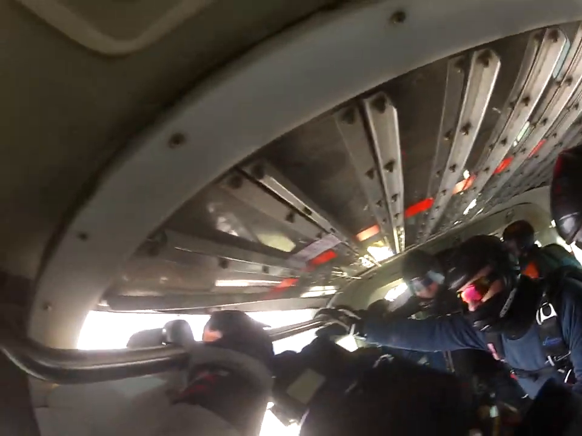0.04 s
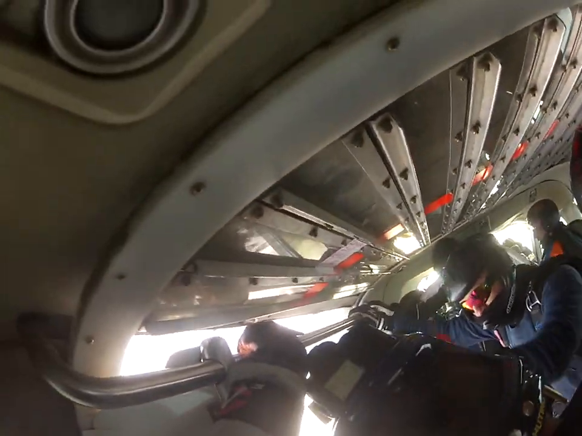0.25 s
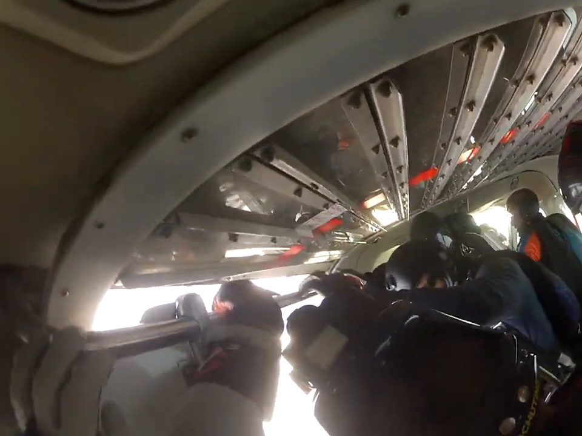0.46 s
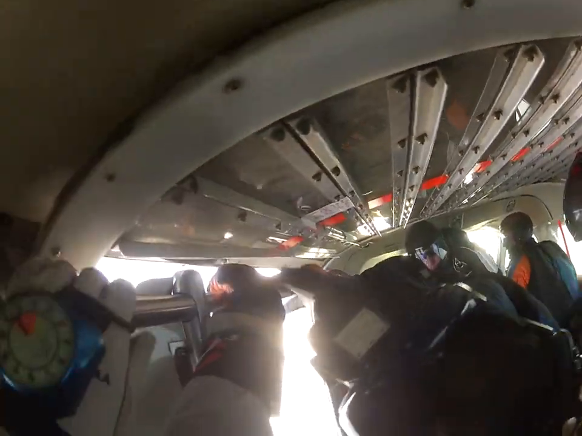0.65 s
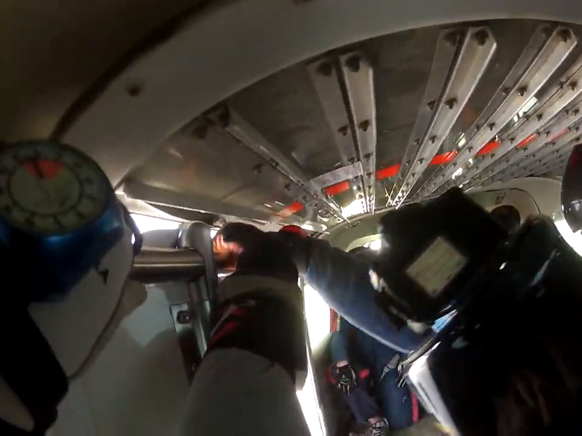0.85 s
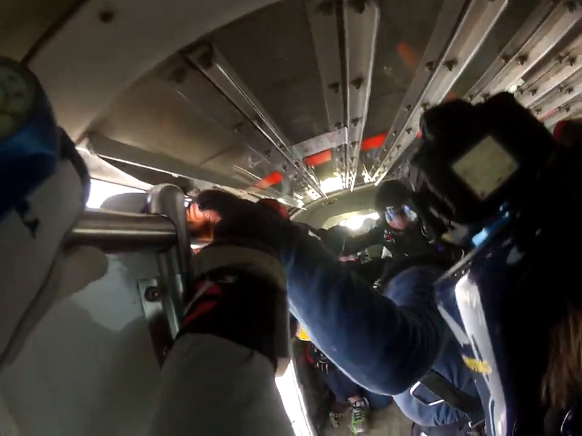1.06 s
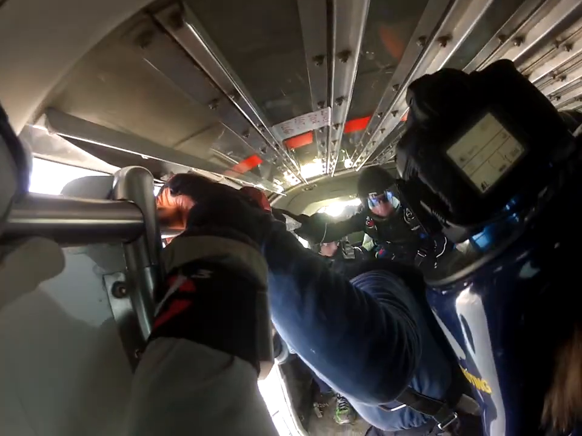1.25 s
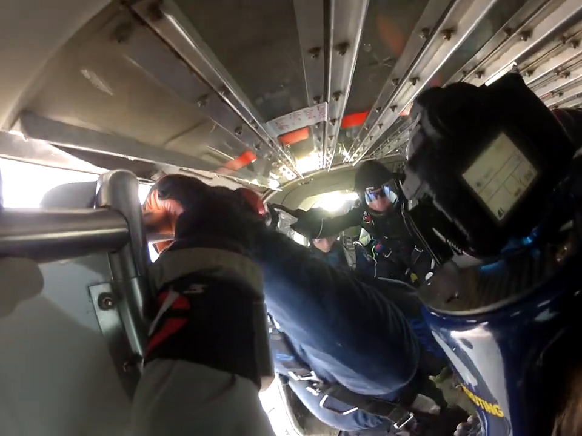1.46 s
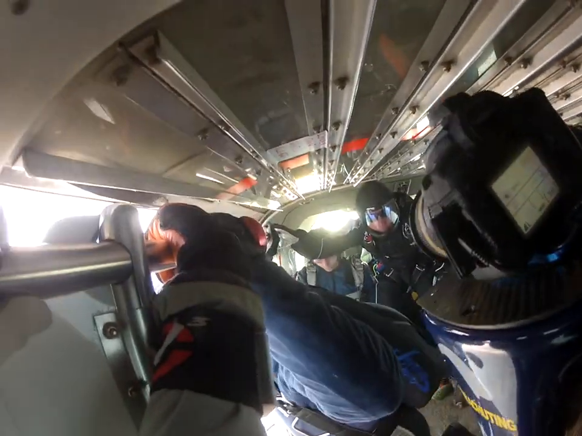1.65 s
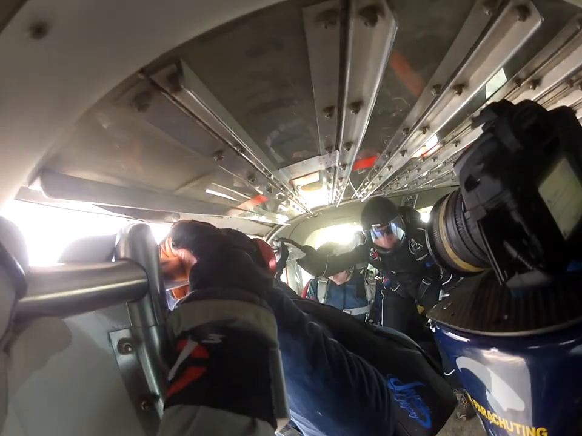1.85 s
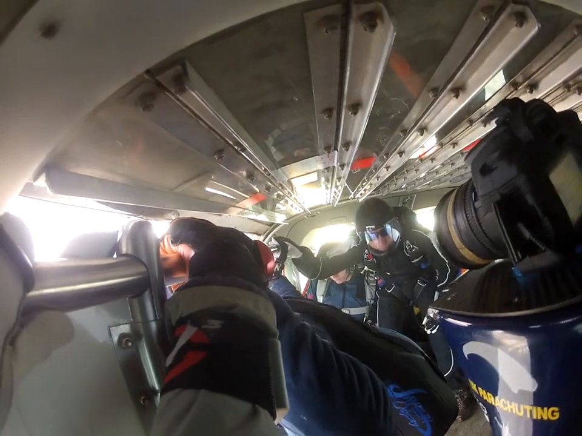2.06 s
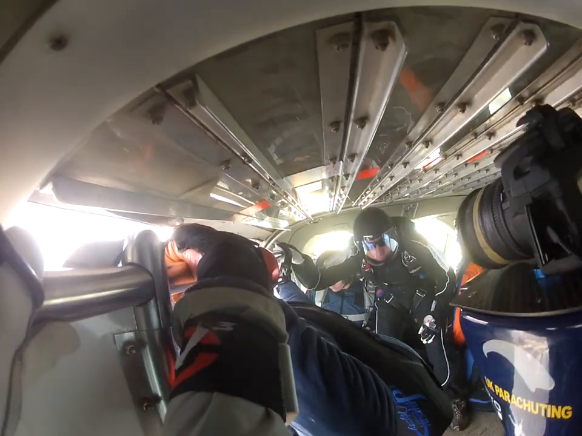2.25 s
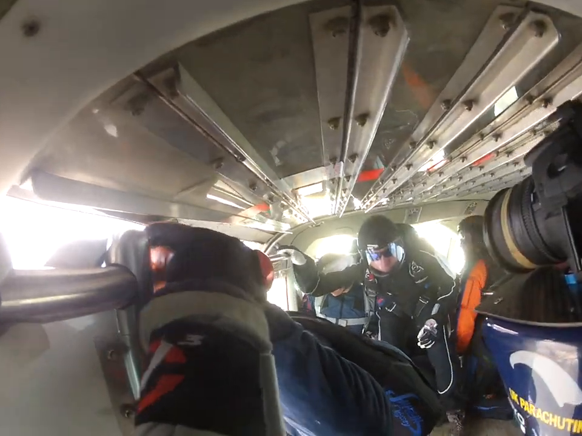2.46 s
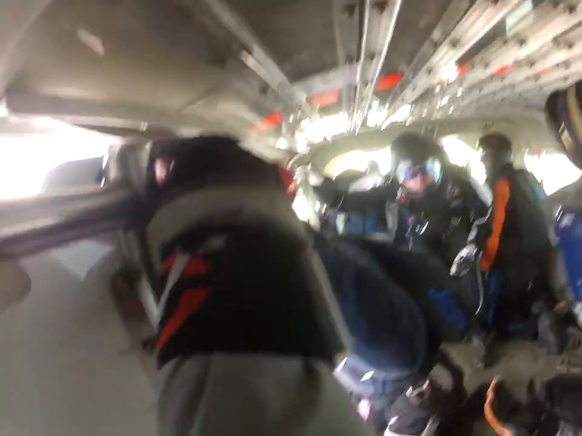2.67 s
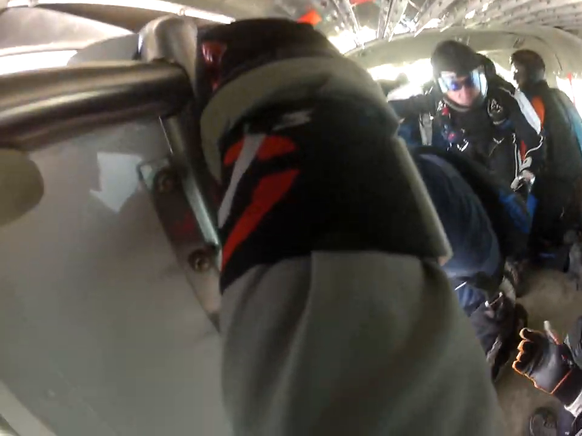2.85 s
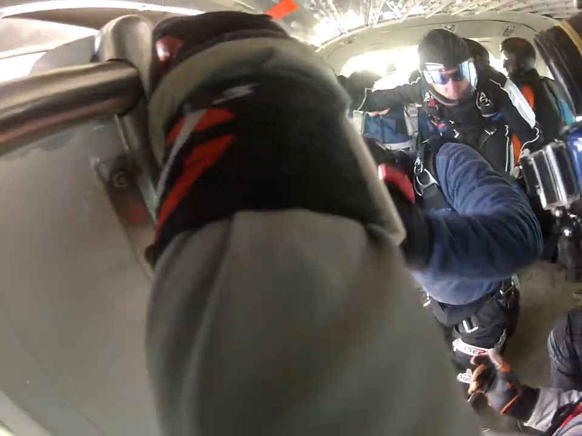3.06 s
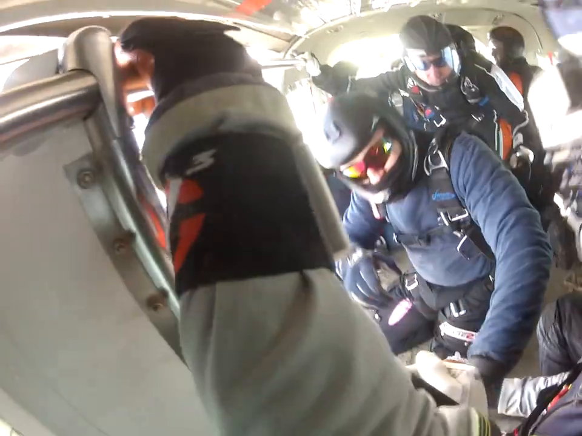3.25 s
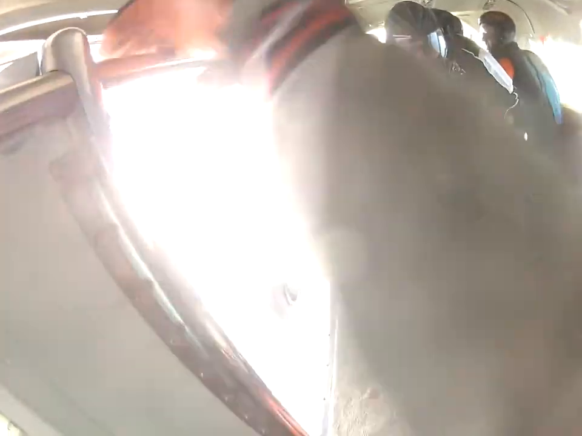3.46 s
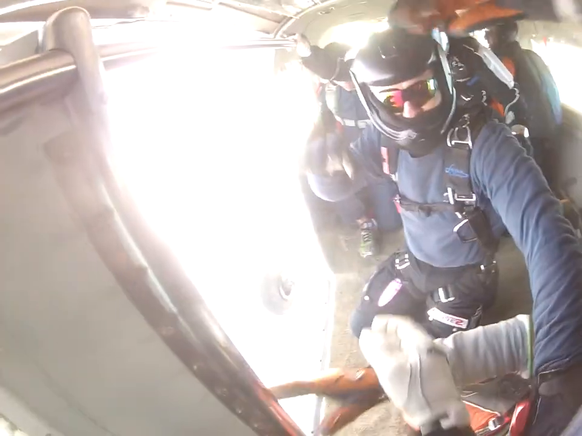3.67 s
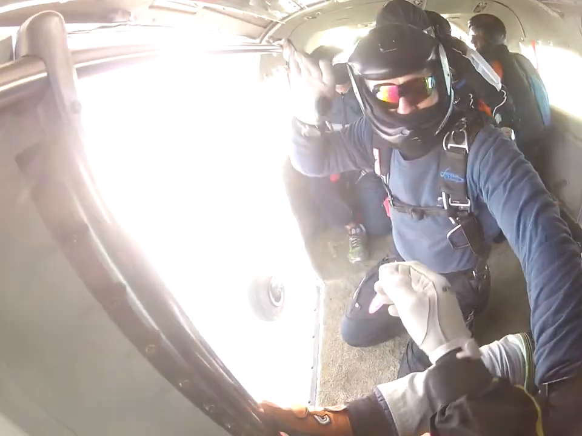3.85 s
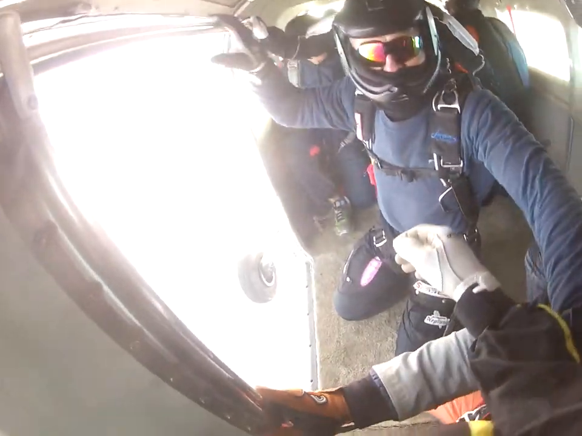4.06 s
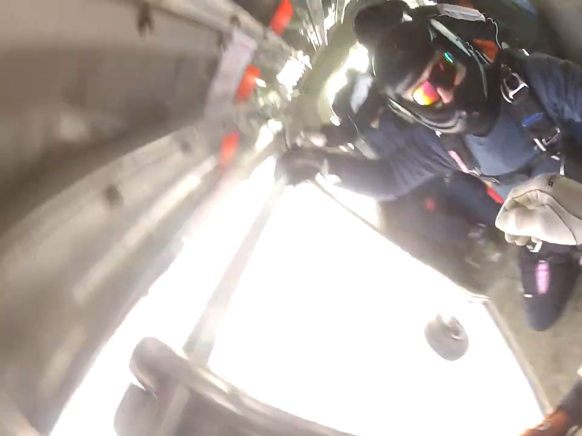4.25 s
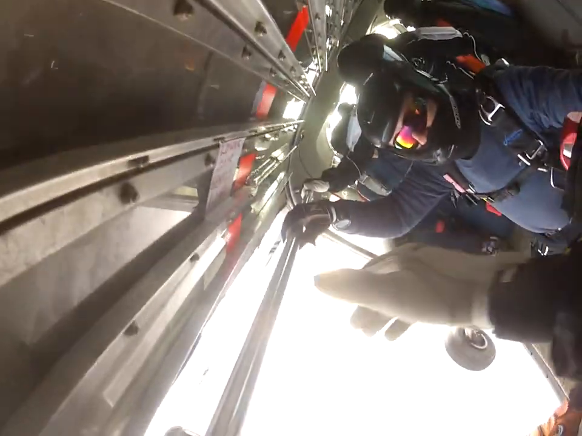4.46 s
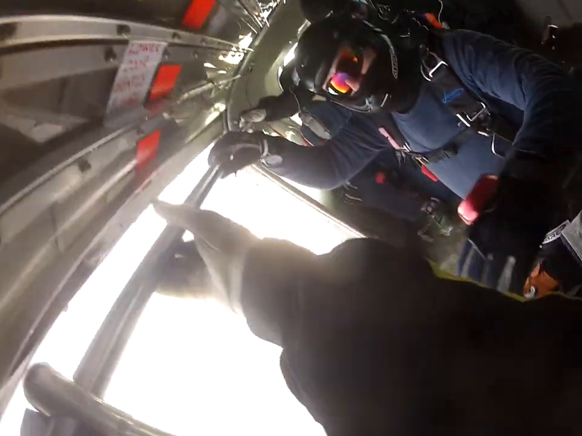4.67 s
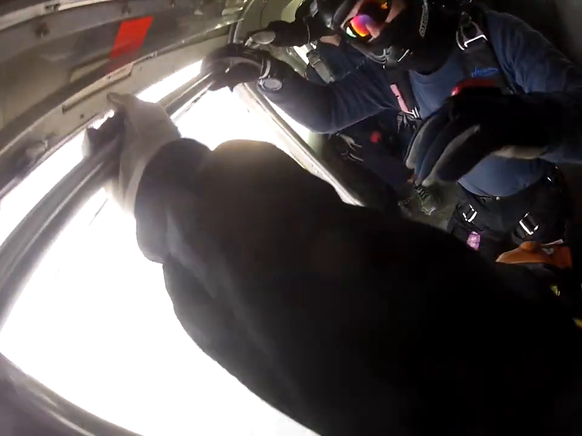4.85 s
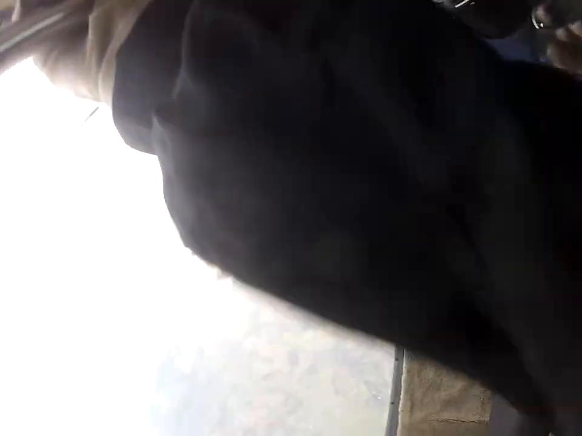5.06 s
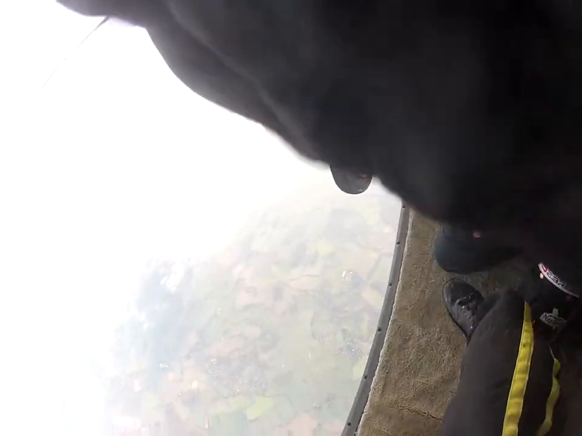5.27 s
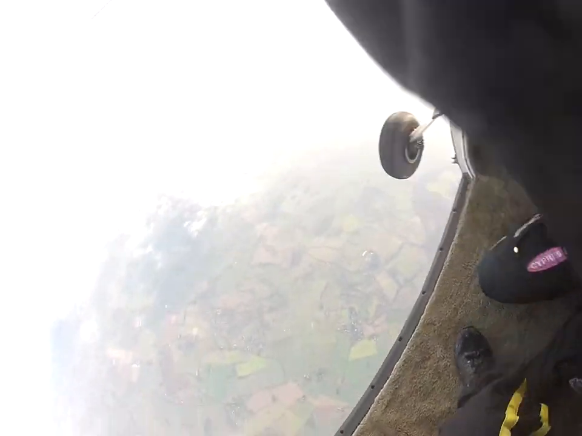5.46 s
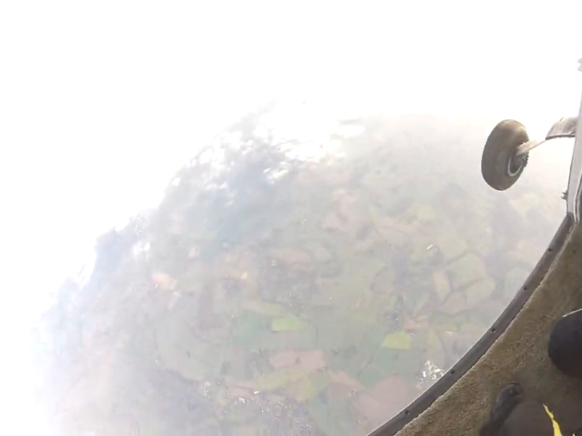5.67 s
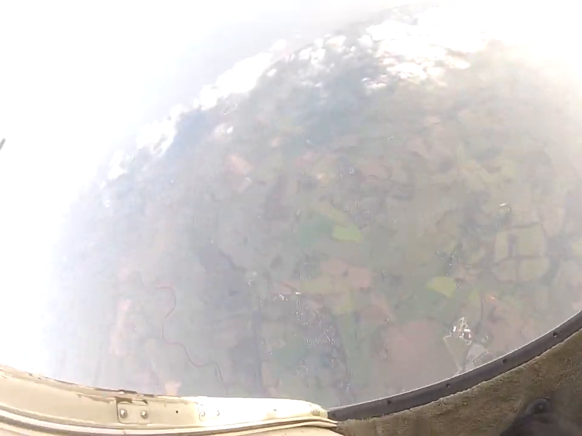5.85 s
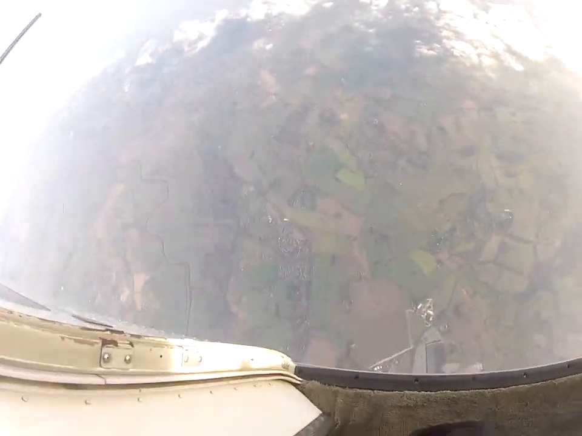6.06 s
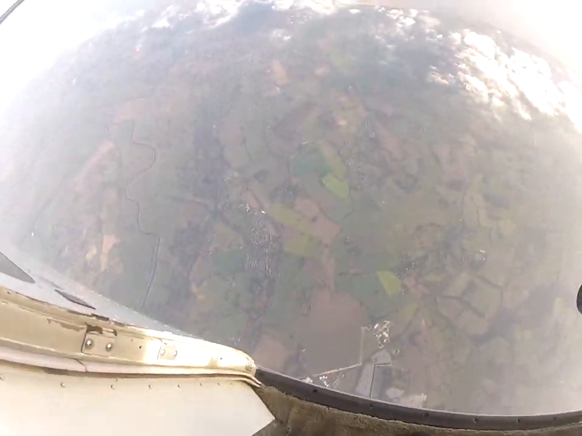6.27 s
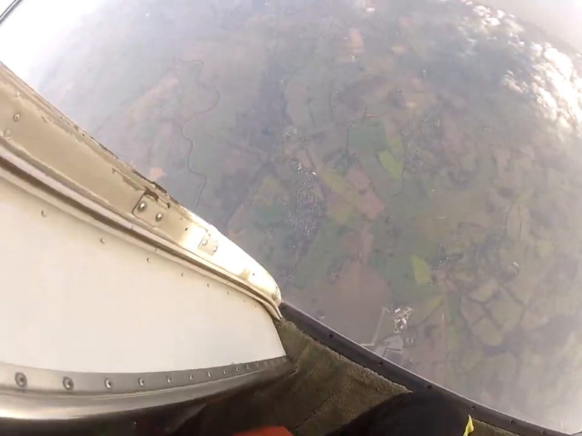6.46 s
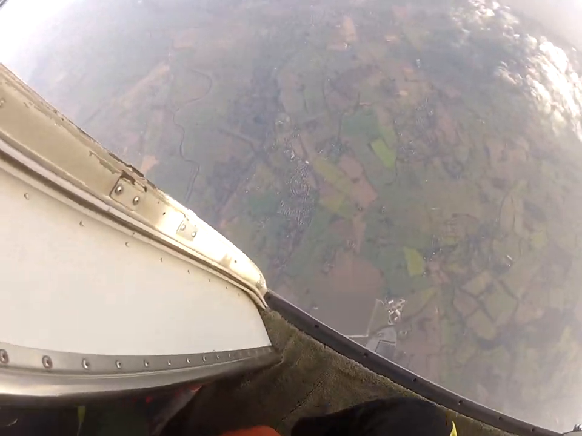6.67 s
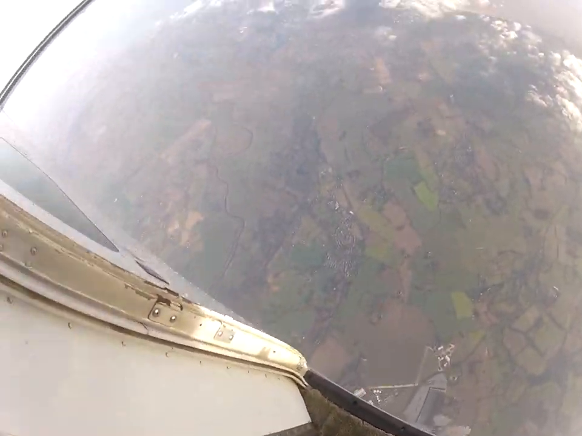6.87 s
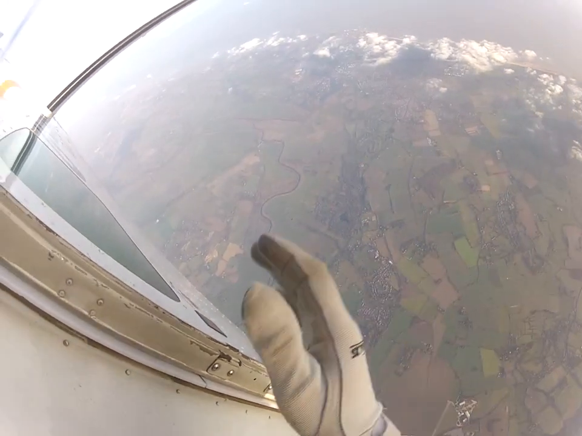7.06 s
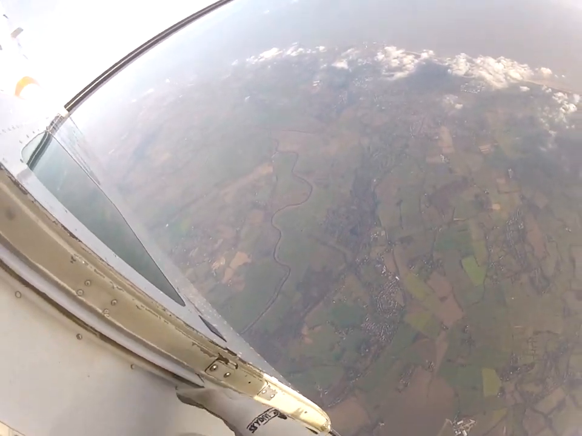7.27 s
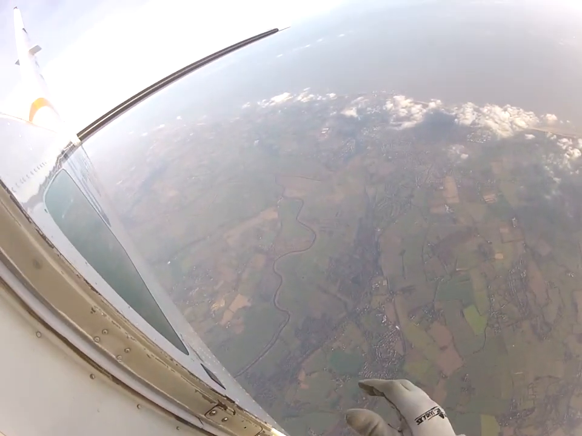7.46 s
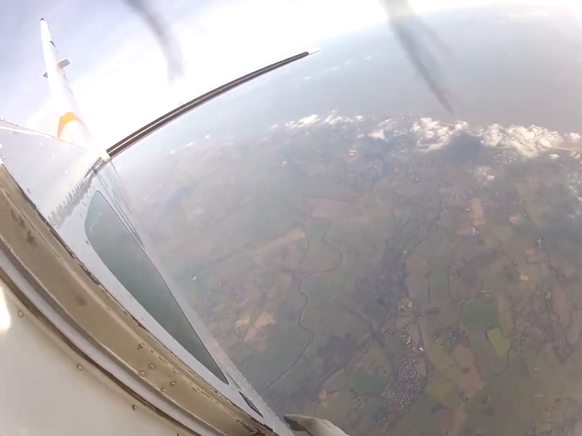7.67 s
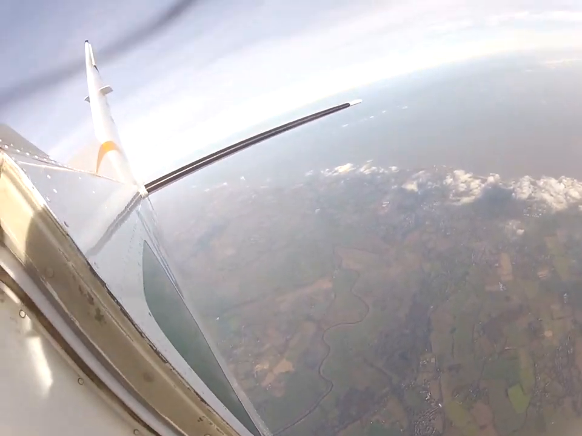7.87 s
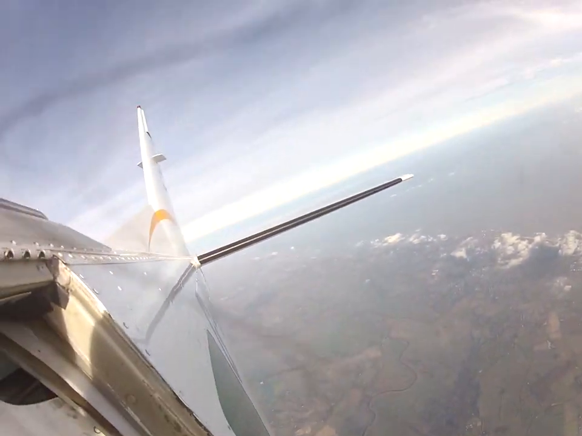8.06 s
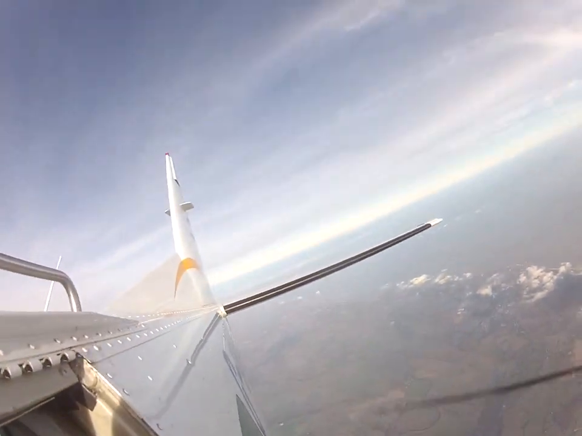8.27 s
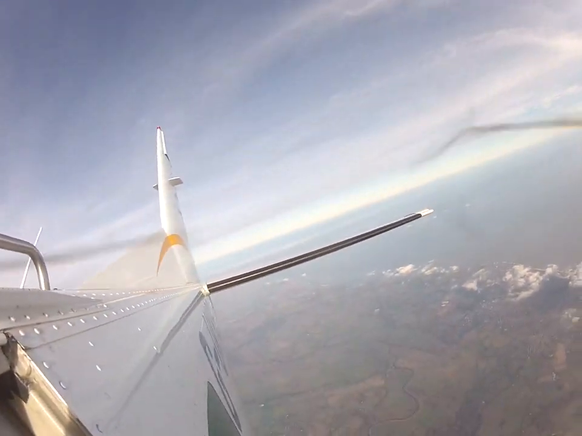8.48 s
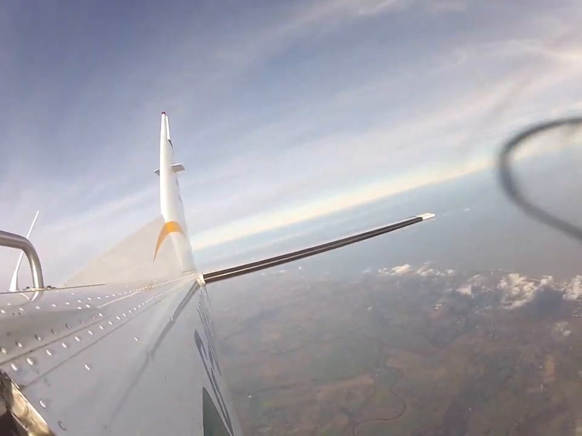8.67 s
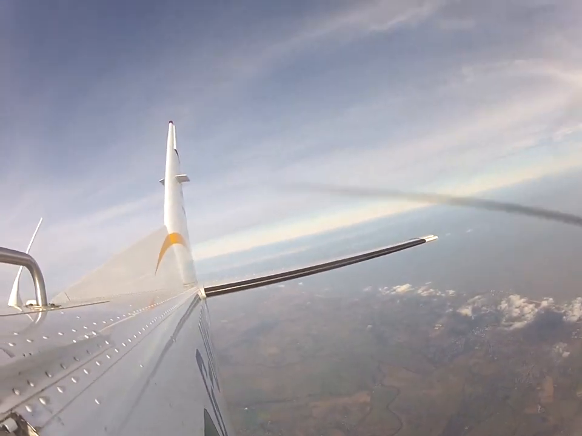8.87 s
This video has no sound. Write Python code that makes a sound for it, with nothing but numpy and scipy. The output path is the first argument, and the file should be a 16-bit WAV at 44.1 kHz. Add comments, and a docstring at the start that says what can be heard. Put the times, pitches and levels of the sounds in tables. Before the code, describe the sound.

Engine hum and flapping air inside a small plane give way to much louder, buffeting wind outside the door.

```python
"""A camera in a case rides in the open door of a jump plane, then is carried out into the wind.
At first the engine and airframe drone, air flutters past the door and gusts thump the microphone.
Near 2.7 s the camera leans into the doorway and the rush grows; near 4.9 s one hard gust hits it.
From about 5.2 s it is outside: the open air roars, and eddies (swirls of air) shake the case and
tear off it in short hissing bursts. The strongest gusts overload the recorder."""
import sys
import numpy as np
from scipy import signal
from scipy.fft import irfft, next_fast_len
from scipy.io import wavfile
from scipy.ndimage import uniform_filter1d

SR = 44100
rng = np.random.default_rng(int(sys.argv[2]) if len(sys.argv) > 2 else 0)


def pcm_store(signal):
    """Save signal as 16-bit PCM."""
    levels = np.round(np.clip(np.atleast_2d(signal), -1, 1) * 32767)
    wavfile.write(sys.argv[1], SR, levels.astype(np.int16).T)


N = 393372
TIME = np.arange(N) / SR
HZ = np.fft.rfftfreq(2 * next_fast_len(N // 2 + 1), 1 / SR)


def gain_of(db):
    """Turns decibels into a number to multiply by."""
    return 10 ** (np.asarray(db) / 20)


def evened(x):
    """Scales a signal to an average power of 1."""
    return x / np.sqrt(np.mean(x ** 2) + 1e-20)


def curve(rows, column=1):
    """Joins a table's points with straight lines, giving a value for every sample."""
    rows = np.asarray(rows)
    return np.interp(TIME, rows[:, 0], rows[:, column])


def colour(points, resonances=()):
    """Gain at every frequency: a smooth outline plus a body's round peaks and steep dips."""
    hz, db = np.transpose(points)
    grid = HZ[::8]
    outline_db = np.interp(np.log(grid + 1), np.log(hz + 1), db, left=-100)
    body_db = sum(height * np.exp(-np.minimum(abs((grid - centre) / width) ** (2 if height > 0 else 4), 20))
                  for centre, width, height in resonances)
    return np.interp(HZ, grid, gain_of(outline_db + body_db))


def noise(gain):
    """Noise of power 1, shaped by a gain at every frequency."""
    spectrum = rng.standard_normal(len(HZ)) + 1j * rng.standard_normal(len(HZ))
    return evened(irfft(gain * spectrum)[:N])


def steadied(x, seconds):
    """Evens out changes in strength that are slower than the given time."""
    power = uniform_filter1d(x ** 2, max(int(seconds * SR), 2))
    return x / np.sqrt(abs(power) + 1e-9)


def eddies(slow_hz, fast_hz):
    """Random swings of air speed, mostly between two rates."""
    low_cut = HZ / np.hypot(HZ, slow_hz) * (HZ > slow_hz / 2)
    return noise(low_cut / np.sqrt(1 + (HZ / fast_hz) ** 3))


def gusting(swing, depth_db):
    """A gain that rises and falls with the eddies."""
    return evened(gain_of(depth_db * 2 * np.tanh(swing / 2)))


def puffs(rows, rise_s):
    """Loudness of short spurts of air: each swells, holds briefly, then collapses."""
    envelope = np.zeros(N)
    for at, db, length in rows:
        near = slice(max(int((at - rise_s) * SR), 0), int((at + .1) * SR))
        t = TIME[near] - at + rise_s
        swell = np.sin(np.pi / 2 * np.clip(t / (2 * rise_s), 0, 1)) ** 2
        collapse = np.exp(-(abs(t) / (length + rise_s)) ** 5)
        envelope[near] += gain_of(db) * swell * collapse
    return envelope


def shedding(per_s):
    """Loudness of small eddies peeling off an edge: a loose train of uneven puffs."""
    gaps, sizes = rng.standard_normal((200, 2)).T
    times = np.cumsum(np.exp(.4 * gaps)) / per_s
    levels_db = 2.5 * np.clip(sizes, -2, 1.2)
    return puffs([(at, db, .011) for at, db in zip(times, levels_db)], rise_s=.0043)


def outside():
    """How far the camera is through the door: 0 inside, 1 outside."""
    return np.interp(TIME, [5.13, 5.2], [0, 1])


# The cabin's drone. Each row: time in seconds, level in dB.
DRONE_LEVEL = [(0, -32.5), (1.0, -33.5), (1.35, -30.5), (1.65, -33.5), (2.65, -34), (2.9, -28), (3.2, -32),
               (4.6, -33), (5.15, -31.5)]
# Its tone. Each row: frequency in Hz, relative level in dB.
DRONE_TONE = [(53, -34), (90, -4.5), (130, 0), (162, -7), (199, -6), (291, -8), (324, -10.5), (377, -10.5),
              (459, -18), (650, -25.5), (840, -50), (1430, -120)]

def drone():
    """Engine and airframe fill the cabin with a low, slightly wavering drone."""
    hum = steadied(noise(colour(DRONE_TONE)), .26) * gain_of(curve(DRONE_LEVEL))
    waver = gusting(eddies(slow_hz=1.8, fast_hz=10), depth_db=1)
    return np.sqrt(1 - outside()) * hum * waver


# The tone of air rushing past the door. Each row: frequency in Hz, relative level in dB.
DOORWAY_TONE = [(250, -35), (520, -10), (750, -8.5), (1200, -13.5), (2700, -16.5), (3100, -9.5),
                (5300, -20), (9000, -22.5), (15200, -31.5)]
# How the case colours cabin sound. Each row: frequency in Hz, width in Hz, boost or cut in dB.
CASE_IN_CABIN = [(1480, 157, 10), (1988, 240, 13), (2450, 190, 8), (6020, 380, -16), (10060, 490, 9),
                 (11290, 400, -17), (12800, 400, -14), (14040, 650, 12.5)]
# Sharp flaps of air at the door's edge. Each row: time in seconds, level in dB.
DOOR_FLAPS = [(.488, -29), (.561, -32), (.643, -33.5), (1.298, -31), (1.426, -29), (2.878, -26.5),
              (3.112, -28), (3.307, -26), (3.371, -28), (3.447, -28), (3.668, -27), (3.805, -27),
              (3.978, -30), (4.274, -25), (4.425, -26), (4.762, -30), (4.952, -27)]
FLUTTER_DB, HISS_DB = -37.3, -45  # before the camera leans out

def doorway():
    """Fast air sliding past the cabin's still air flutters and flaps over an even hiss."""
    shape = colour(DOORWAY_TONE, CASE_IN_CABIN)
    leaning = np.interp(TIME, [2.7, 2.8], [0, 1])
    lean_db = 4 * leaning
    # The share of each frequency that flutters: most of the middle, some of the top.
    middle = np.exp(-((HZ - 1750) / 750) ** 4)
    top = HZ ** 4 / (HZ ** 4 + 6500 ** 4)
    lively = np.clip(.1 + .8 * middle + .45 * top, 0, 1)
    lively_shape = shape * np.sqrt(lively)
    swing = evened(eddies(slow_hz=18, fast_hz=10.4) + .8 * eddies(slow_hz=30.4, fast_hz=80))
    wobble = gusting(swing, depth_db=2 + .4 * leaning)
    spurts = gain_of(-.5 + 4.5 * leaning) * shedding(per_s=19)
    strength = steadied(np.hypot(wobble, spurts), .27)
    flutter = gain_of(FLUTTER_DB + lean_db) * strength * noise(lively_shape)
    # A flap rings the case's low resonances and has little treble.
    dull_air = noise(lively_shape / np.hypot(1, HZ / 2500))
    flaps = puffs([(at, db, .012) for at, db in DOOR_FLAPS], rise_s=.0031) * dull_air
    hiss = gain_of(HISS_DB + lean_db) * noise(shape * np.sqrt(1 - lively))
    return np.sqrt(1 - outside()) * (flutter + flaps + hiss)


# The open air's low roar. Each row: time in seconds, relative level in dB.
ROAR_LEVEL = [(5.15, -31.5), (5.39, -26.5), (5.66, -30.5), (5.8, -19.5), (6.2, -21), (7.0, -19.5),
              (7.12, -25), (7.45, -22), (8.1, -24), (8.25, -27.5), (8.64, -23), (8.9, -24)]
# Its tone. Each row: frequency in Hz, relative level in dB.
ROAR_TONE = [(53, -23), (90, -2), (118, -4), (172, -1.5), (237, -6), (511, -21.5), (650, -33.5), (840, -46),
             (1430, -120)]

def roar(flow):
    """The open air roars in lumps; the part above about 270 Hz jumps most with each burst."""
    shape = colour(ROAR_TONE)
    upper = 1 / (1 + (270 / (HZ + 1)) ** 6)
    upper_share = np.sum(shape ** 2 * upper) / np.sum(shape ** 2)
    push = steadied(flow, .19)
    low = np.sqrt(1 - upper_share) * noise(shape * np.sqrt(1 - upper)) * push ** .53
    high = np.sqrt(upper_share) * noise(shape * np.sqrt(upper)) * push ** .81
    low *= gain_of(np.interp(TIME, [7.5, 7.9], [0, -2.5]))  # thins as the camera turns to the tail
    lumps = gusting(eddies(slow_hz=4.3, fast_hz=25), depth_db=1.7)
    open_air = steadied((low + high) * lumps, .17) * gain_of(curve(ROAR_LEVEL) + 2.04)
    return np.sqrt(outside()) * open_air


def thump(at_s, level_db, pitch_hz, length_s):
    """A lone gust hits the microphone with one push and pull of pressure."""
    t = TIME - at_s
    envelope = np.exp(-np.minimum((t / length_s) ** 2, 20))
    return -gain_of(level_db) * np.sin(2 * np.pi * pitch_hz * t) * envelope


# The steady push of eddies on the microphone. Each row: time in seconds, level in dB.
BUFFET_LEVEL = [(0, -34), (1.3, -34), (2.65, -34.5), (3.3, -31), (4.3, -34.5), (4.8, -33.5), (5.15, -29),
                (5.3, -18), (5.8, -11.5), (5.97, -22.5), (6.5, -17.5), (7.2, -19.5), (7.65, -15),
                (8.1, -11.5), (8.5, -20.5), (8.68, -15.5), (8.9, -21)]
# Its tone. Each row: frequency in Hz, relative level in dB.
BUFFET_TONE = [(10, -35), (22, -22), (32, -5.5), (44, 1), (62, -2), (80, -9), (110, -16), (170, -22),
               (290, -63)]
# Gusts that swell and fade. Each row: peak time in seconds, peak level in dB, half length in seconds.
GUSTS = [(0.396, -22, 0.022), (.58, -27.5, 0.027), (1.568, -25, 0.026), (2.942, -21.5, 0.065),
         (3.26, -28.5, 0.074), (3.497, -21, 0.076), (4.096, -19.5, 0.03), (4.94, -21, 0.053),
         (5.065, -26, 0.025), (5.623, -16, 0.016), (5.778, -9, 0.042), (6.574, -12.5, 0.018),
         (7.276, -14, 0.038), (7.465, -12.5, .03), (7.773, -10.5, 0.051), (7.913, -11, 0.043),
         (8.047, -9, 0.022), (8.657, -14.5, 0.052)]
GUST_TOP_HZ = 83.5  # gusts are the largest eddies, so they sound lowest

def buffet():
    """Large eddies rock the pressure at the microphone, harder and deeper in each gust."""
    shape = colour(BUFFET_TONE)
    gusts = sum(gain_of(db) * np.exp(-.5 * np.minimum(((TIME - at) / half) ** 2, 20))
                for at, db, half in GUSTS)
    deep_rumble = steadied(noise(shape / np.sqrt(1 + (HZ / GUST_TOP_HZ) ** 6)), .087)
    rumble = steadied(noise(shape), .126)
    return gain_of(curve(BUFFET_LEVEL)) * rumble + gusts * deep_rumble


# Surges of the hiss. Each row: time it breaks away in seconds, level change by then in dB.
SURGES = [(5.53, 8.5), (6.146, 1.5), (6.767, -2.5), (7.02, 3.5), (7.285, 3), (7.52, 1), (7.77, -0.5),
          (7.815, 1), (7.945, 4), (8.15, 1.5), (8.38, 2.5)]
BUILD_S, BREAK_S, LULL_S, LULL_DB = .089, .0054, .056, -4

def surging():
    """Level change in dB as the airflow builds, breaks away and leaves a short lull."""
    stages_s = [-BUILD_S, -BUILD_S / 2, 0, BREAK_S, BREAK_S + LULL_S / 2, BREAK_S + LULL_S]
    return sum(np.interp(TIME - at, stages_s, [0, .65 * db, db, LULL_DB, LULL_DB, 0])
               for at, db in SURGES)


# Air rubbing over the case, weaker and more ragged wherever it lifts away.
# Each row: time in seconds, relative level in dB, amount of flicker in dB.
AIRFLOW = [(5.15, -32, 1), (5.4, -25, 2.5), (5.6, -26.5, 1), (5.84, -25, 5), (5.93, -18.5, 2.5),
           (6.14, -19.5, 1.8), (6.24, -23, 3.5), (6.52, -27.5, 6), (6.8, -24, 3), (6.96, -20, -3),
           (7.06, -23, 3.5), (7.48, -23.5, 1.5), (7.7, -23, 1.5), (7.96, -24, 2), (8.25, -21.5, 3.5),
           (8.42, -22, 3), (8.53, -20, 3.5), (8.9, -20.5, 3.5)]
# The largest eddies tearing off. Each row: time in seconds, relative level in dB, length in seconds.
BURSTS = [(5.189, -20.5, 0.0093), (5.225, -23, .009), (5.294, -21.5, 0.011), (5.352, -20, 0.0093),
          (5.395, -16, 0.0046), (5.439, -19.5, 0.01), (5.575, -25.5, 0.017), (5.615, -17.5, 0.0072),
          (5.688, -23.5, 0.0066), (5.751, -21, .009), (5.807, -14, 0.0076), (6.236, -18, 0.0097),
          (6.285, -21.5, 0.033), (6.326, -19, .019), (6.357, -15, 0.0094), (6.399, -19, 0.018),
          (6.491, -18, 0.0097), (6.501, -14.5, 0.0071), (6.553, -20, 0.015), (6.575, -21.5, 0.029),
          (6.609, -11.5, 0.0072), (6.706, -17, .011), (6.755, -19, 0.012), (6.909, -14, 0.012),
          (7.003, -26, 0.019), (7.268, -19, 0.016), (7.408, -18, .008), (7.454, -20, 0.041),
          (7.521, -16, 0.0086), (7.588, -16, 0.012), (7.802, -18, 0.01), (7.939, -14, 0.0067),
          (8.006, -16, 0.006), (8.071, -14.5, 0.0076), (8.143, -15, 0.0068), (8.193, -15, 0.0083),
          (8.226, -23, 0.0055), (8.373, -10.5, 0.0035)]
SLACK_DB, WAKE_DB = -3.5, -1.5  # dips just before and just after a burst

def airflow():
    """Strength of the air on the case: it flickers, slackens, tears off in a burst, then recovers."""
    swing = eddies(slow_hz=9.5, fast_hz=79)
    crackle = gusting(eddies(slow_hz=150, fast_hz=400), depth_db=1.1)  # bursts break into tiny eddies
    bursts = puffs(BURSTS, rise_s=.0029) * crackle * gain_of(.8)
    slack = np.clip(puffs([(at - .01, 0, .0098) for at, _, _ in BURSTS], rise_s=.003), 0, 1)
    wake = np.clip(puffs([(at + length, 0, .012) for at, _, length in BURSTS], rise_s=.003), 0, 1)
    ragged_db = curve(AIRFLOW, column=2)
    spurts = gain_of(-2.5 + .6 * ragged_db) * shedding(per_s=13)
    flicker = steadied(np.hypot(gusting(swing, 1.02 * ragged_db), spurts), .136)
    level_db = curve(AIRFLOW) + surging() + SLACK_DB * slack + WAKE_DB * wake + .37
    return np.hypot(gain_of(level_db) * flicker, bursts)


def passing_swirls(air, depth_db):
    """Passing swirls favour one pitch, then another, in patches about 300 Hz wide and 40 ms long."""
    hz, _, spectra = signal.stft(air, SR, nperseg=512, noverlap=384)
    patches = rng.standard_normal(spectra.shape[::-1]).T
    patches = uniform_filter1d(patches, size=4, axis=0)  # smooth across pitch
    patches = evened(uniform_filter1d(patches, size=14, axis=1))  # and across time
    patches_db = depth_db * patches / (1 + (hz[:, None] / 5000) ** 4)
    return signal.istft(spectra * gain_of(patches_db), SR, nperseg=512, noverlap=384)[1][:N]


# The tone of the hiss on the case. Each row: frequency in Hz, relative level in dB.
SLIPSTREAM_TONE = [(250, -17), (520, -11), (700, -11.5), (900, -7.5), (2300, -4.5), (3200, -9.5),
                   (4200, -18.5), (8000, -23.5), (9200, -18), (15200, -25.5)]
# How the case colours that hiss. Each row: frequency in Hz, width in Hz, boost or cut in dB.
CASE_IN_WIND = [(1266, 140, 4), (1934, 150, 7), (3510, 160, 6.5), (5070, 340, 4.5), (6020, 380, -29),
                (6960, 350, 4), (8520, 180, 6.5), (9980, 220, 7), (11430, 430, -19), (12560, 380, -15),
                (14100, 480, 9)]
# The tone shifts as the case turns in the wind.
# Each row: time in seconds, relative level of the low howl in dB, and of the high shriek in dB.
CASE_TURNING = [(5.15, -6, -8), (5.39, -1, -3), (5.49, -10, -.5), (5.53, -3, -0.5), (5.61, -4.5, -11.5),
                (5.8, -4.5, -4), (5.9, -1, -2.5), (6.45, -2, -2.5), (6.95, 0.5, -6), (7.1, 0.5, -5),
                (7.6, -1.5, -5.5), (8.02, -2.5, -4.5), (8.2, -4, -1), (8.9, -3, -3.5)]

def slipstream(flow):
    """Outside air hisses on the case in four bands; every eddy lifts all of them at once."""
    shape = colour(SLIPSTREAM_TONE, CASE_IN_WIND)
    band = np.searchsorted([1600, 2400, 3800], HZ)  # howl, core, shriek, fizz from low to high
    howl_db, shriek_db = curve(CASE_TURNING, column=1), curve(CASE_TURNING, column=2)
    core = noise(shape * (band == 1))
    howl = noise(shape * (band == 0)) * gain_of(howl_db - .4)
    shriek = noise(shape * (band == 2)) * gain_of(shriek_db - 1.5)
    fizz = noise(shape * (band == 3)) * gain_of(.3 * shriek_db - 4.5)
    # Small eddies hiss higher than large ones, so the balance keeps shifting.
    shriek *= gusting(eddies(slow_hz=18, fast_hz=50), depth_db=1.3)
    fizz *= gusting(eddies(slow_hz=11, fast_hz=50), depth_db=-1.3)
    air = passing_swirls(howl + core + shriek + fizz, depth_db=2)
    return np.sqrt(outside()) * steadied(air, .04) * flow


def scene():
    """The plane and all of the air, heard at one microphone."""
    flow = airflow()
    gusts = buffet() + thump(at_s=4.9275, level_db=-5, pitch_hz=39, length_s=.018)
    return (gusts + drone() + roar(flow) + doorway() + slipstream(flow))[None]


CEILING, TOP_HZ = .72, 15500

def record(dry):
    """The recorder flattens the strongest gusts against its ceiling, then cuts the highest treble."""
    flattened = dry / (1 + (dry / CEILING) ** 8) ** (1 / 8)
    treble_cut = signal.firwin(511, TOP_HZ, window=("kaiser", 9), fs=SR)
    return signal.oaconvolve(flattened, treble_cut[None], "same")


dry = scene()
out = record(dry)
pcm_store(out)
```